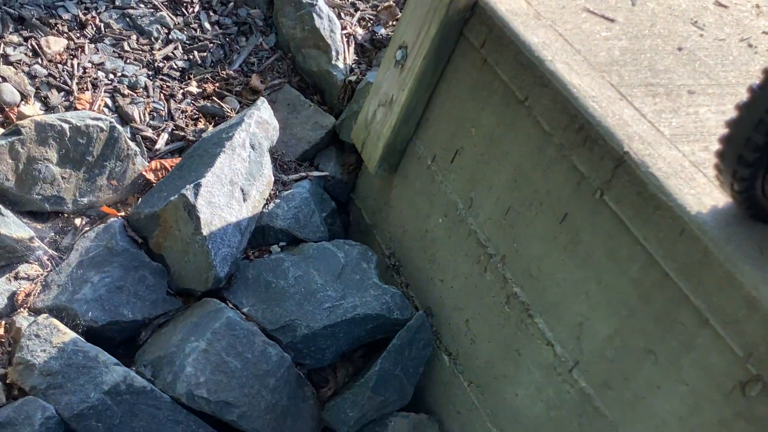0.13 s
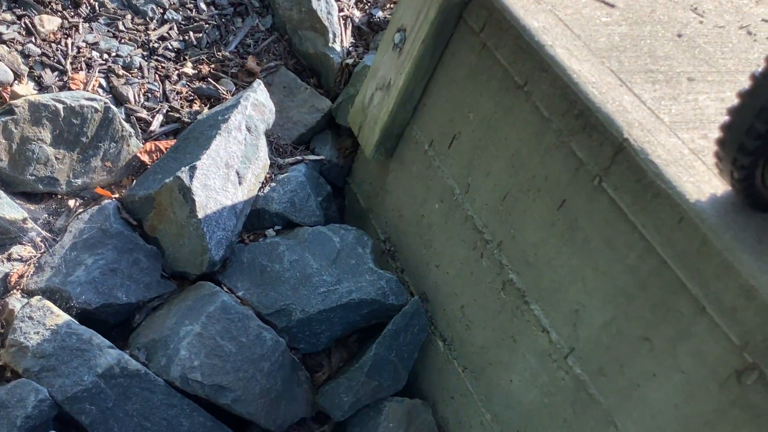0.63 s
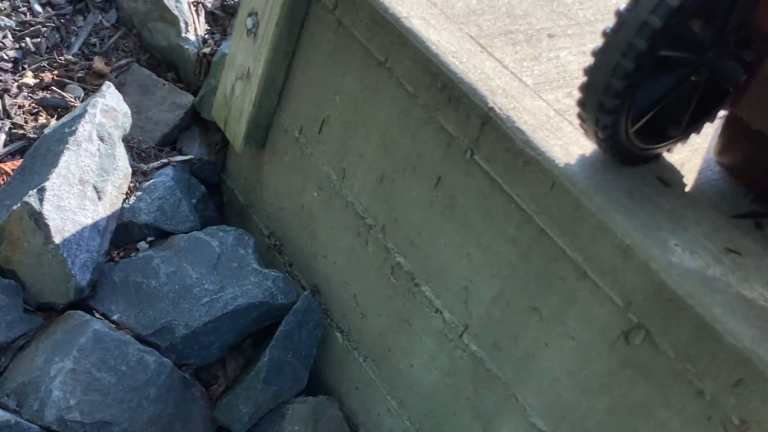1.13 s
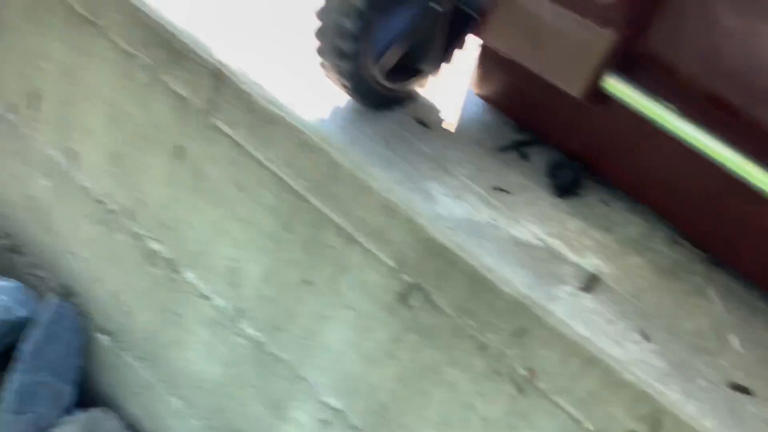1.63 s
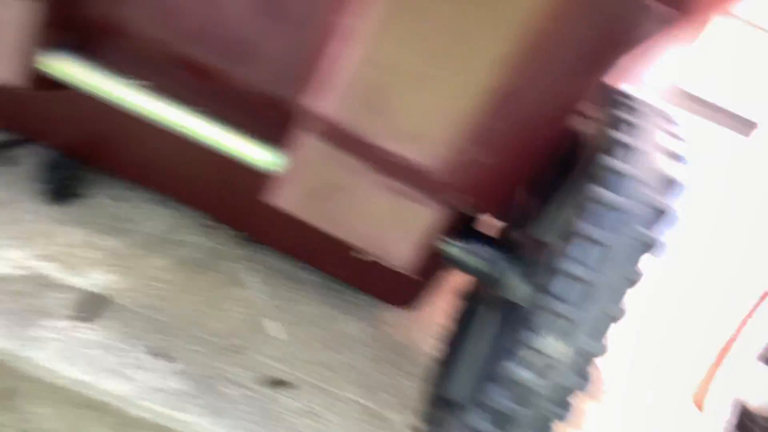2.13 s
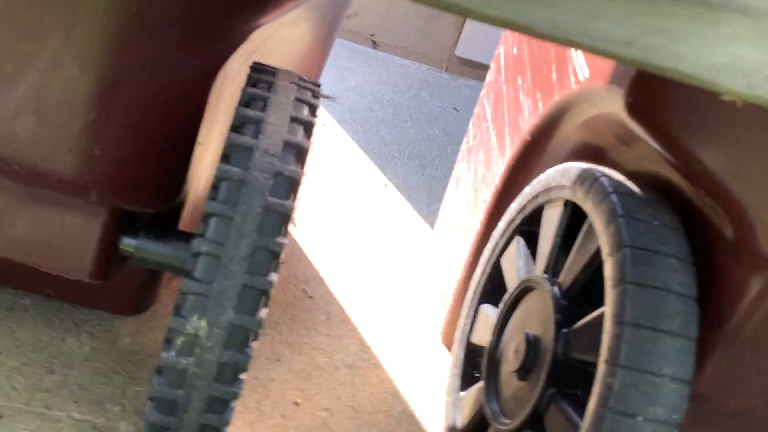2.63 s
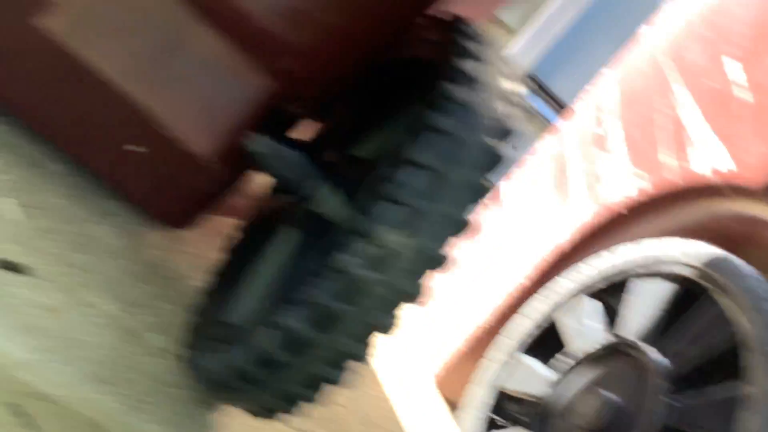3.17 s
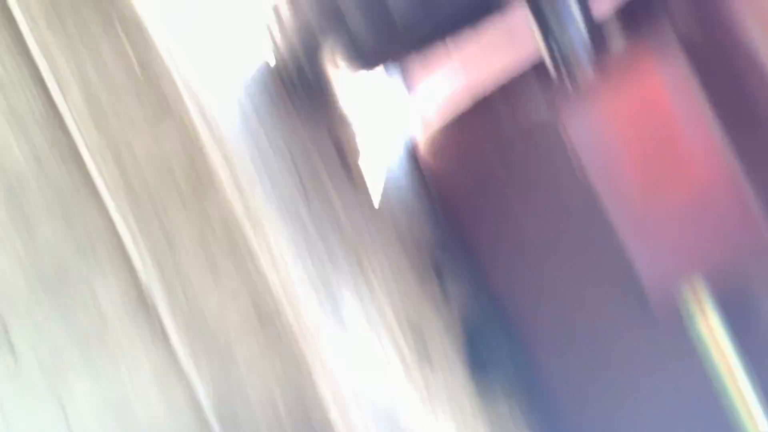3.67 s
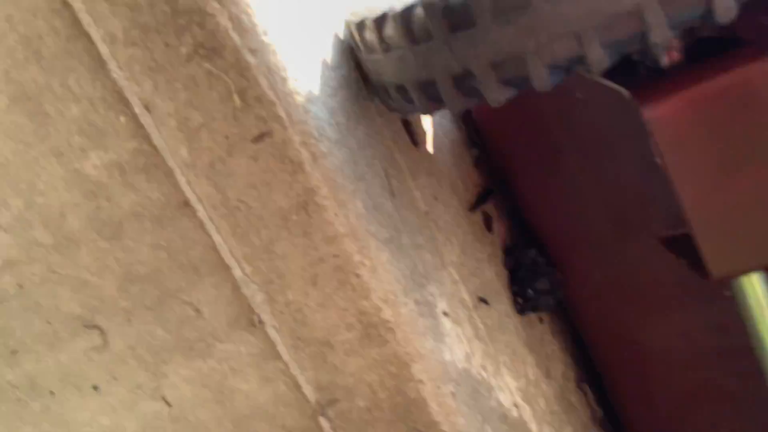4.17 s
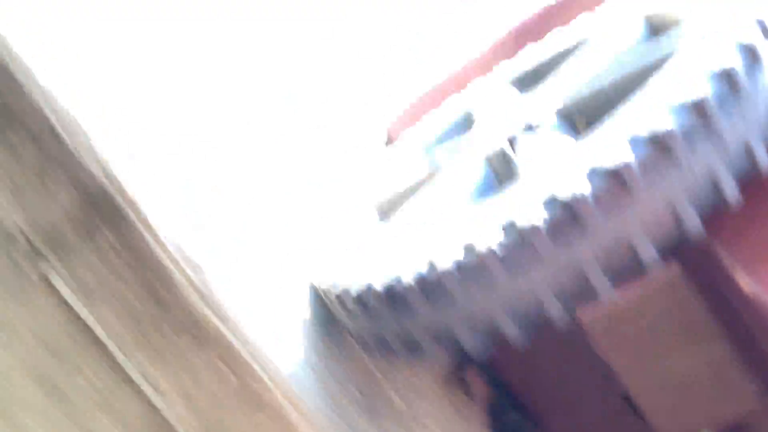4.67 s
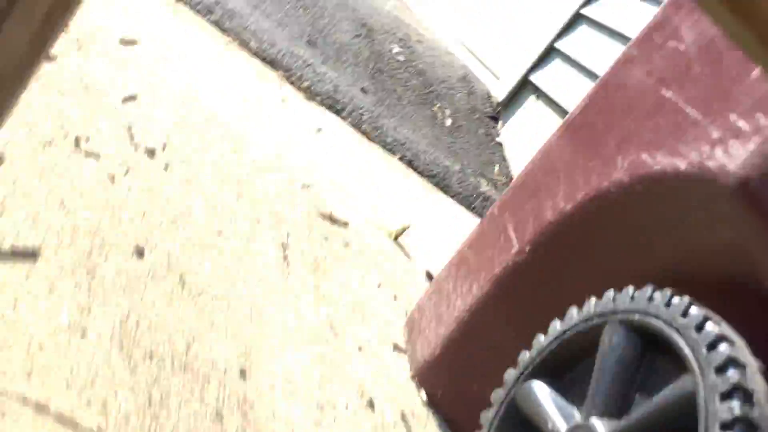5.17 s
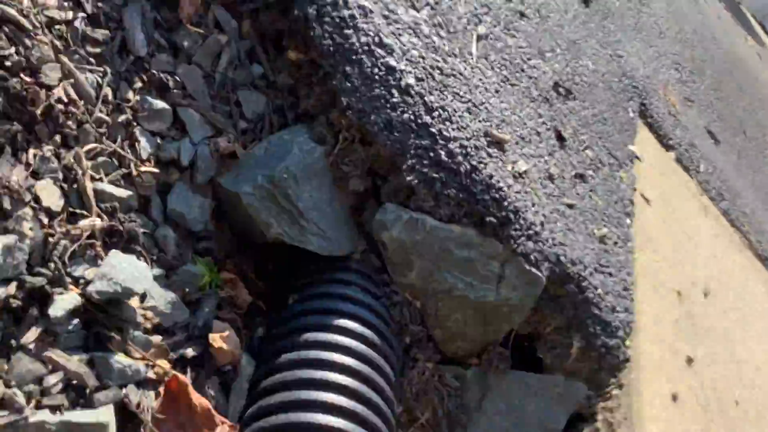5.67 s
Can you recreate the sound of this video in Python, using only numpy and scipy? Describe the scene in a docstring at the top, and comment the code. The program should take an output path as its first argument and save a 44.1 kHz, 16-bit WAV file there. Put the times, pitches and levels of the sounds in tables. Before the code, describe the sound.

Close grit scrapes, clicking stones and one hard knock late on, with echoing bird whistles and a distant buzzy bird outdoors.

```python
"""Footsteps on grit with two birds

Low over gravel and concrete outdoors, a bird repeats falling whistles that echo off the houses; a second one,
further off, buzzes by a trembling pitch. Soles scuff grit (dense noise grains), stones click (noise puffs that
ring damped modes of the handled phone's body) and grind (clustered grains in one band). Footfalls and bumps of
the handled phone give dull knocks, sines of sagging pitch, over a distant traffic rumble of shaped noise."""
import sys
import numpy as np
from scipy import signal
from scipy.fft import rfft, irfft
from scipy.io import wavfile
from scipy.ndimage import uniform_filter1d

SR = 44100
rng = np.random.default_rng(int(sys.argv[2]) if len(sys.argv) > 2 else 0)


def waveform_to_disk(signal):
    """Save audio, clipped to [-1, 1], as 16-bit WAV at the path in sys.argv[1]."""
    frames = np.transpose(np.atleast_2d(signal))
    scaled = np.clip(frames, -1, 1) * 32767
    samples = np.round(scaled).astype(np.int16)
    wavfile.write(sys.argv[1], SR, samples)


def how_loud(loudness_db):
    """Turn decibels into a plain amplitude multiplier (0 dB gives 1, 20 dB gives 10)."""
    steps = np.asarray(loudness_db, float) / 20
    return 10 ** steps


N = 255780  # length in samples

# Spectrum of the distant traffic. Each row: frequency in Hz, relative level in dB.
TRAFFIC_SPECTRUM = [(24, -36.5), (40, -19.5), (64, 2), (93, 3), (202, -13.5), (260, -12.5), (397, -15),
                    (926, -16), (1130, -25), (1680, -41.5), (3300, -47), (7340, -45), (15500, -48)]
# Pitch glides of the near bird, by name. Each entry: length in seconds, then points of (share of length, Hz).
NOTE_SHAPES = {"low": (0.036, [(0, 3300), (.2, 3300), (1, 2375)]), "high": (0.028, [(0, 5000), (.3, 4860),
               (1, 4500)]), "bend": (.064, [(0, 4580), (.45, 4300), (1, 3300)]), "dive": (.057, [(0, 4970),
               (.25, 4720), (1, 2860)]), "slide": (0.055, [(0, 4750), (.3, 4490), (1, 3400)])}
# One song of the near bird. Each row: delay after the song's start in seconds, note shape, relative level in dB.
SONG_NOTES = [(0, "bend", -2.5), (.121, "dive", -2), (.217, "dive", 0), (.335, "dive", -0.5)]
# Songs sung. Each row: start in seconds, level in dB, lead-in level in dB, gain per note in dB, number of notes.
SONG_STARTS = [(0.586, -58, -70, -0.5, 4), (2.092, -55.5, -67, -1.2, 4), (5.174, -64.5, -76, .5, 3)]
# Stones struck. Each row: start in seconds, crack level in dB, ring level in dB.
STONE_CLICKS = [(1.2395, -45, -75), (1.279, -35, -62.5), (1.2875, -40, -65), (1.3049, -31, -60),
                (1.3874, -36.5, -71), (1.4108, -34, -67.5), (1.472, -42, -72), (1.5131, -24.5, -56.5),
                (1.5237, -23, -61), (1.583, -35, -61), (1.694, -35.5, -67), (1.752, -43, -85),
                (2.003, -33, -56), (2.4783, -37, -81), (2.5555, -38, -94), (2.585, -28.5, -65),
                (3.1181, -32, -51), (3.2628, -27, -36), (3.3964, -33, -45), (3.4383, -26.5, -38),
                (3.4442, -28, -34), (3.707, -28, -67), (3.764, -37, -55.5), (3.805, -21, -61),
                (3.894, -20, -69), (4.1321, -52, -47.5), (4.2102, -37, -72), (4.798, -29.5, -57),
                (4.931, -28, -66), (4.9355, -24, -69), (4.973, -25.5, -48), (5.353, -30, -58),
                (5.4944, -42, -37), (5.5042, -5.5, -17), (5.5142, -46, -42), (5.6384, -54, -47.5),
                (5.705, -25, -58), (5.7793, -33, -62)]
# Lone grit ticks, nearly all crack. Each row: start in seconds, crack level in dB.
GRIT_TICKS = [(1.647, -35), (1.666, -40), (1.8914, -38.5), (1.9092, -41), (3.1556, -36), (3.1927, -43),
              (3.745, -31), (3.791, -31), (3.964, -34), (4.042, -30), (4.0614, -32), (4.09, -34),
              (4.222, -40), (4.255, -38), (4.2794, -32), (4.3822, -42), (4.415, -29.5), (4.4867, -35),
              (4.5279, -31), (4.5828, -36), (4.6553, -36), (4.6807, -34), (4.79, -40.5)]
# Modes of the handled phone's body, rung by every click. Each row: nominal frequency in Hz, mean relative level
# in dB, 60 dB decay in seconds.
BODY_MODES = [(1200, 1.5, 0.0035), (1830, -19.5, 0.0082), (2115, 0.5, 0.0043), (2830, -12.5, 0.0055),
              (3300, -28, 0.014), (4860, -12, 0.0024), (5500, -13, 0.0029)]
# Spectrum of fine grit and splinters. Each row: frequency in Hz, relative level in dB.
GRIT_SPECTRUM = [(2350, -17.5), (4000, -8.5), (8160, -8), (9170, -6), (12200, -2), (13900, -4), (16000, -3)]
# Spectrum of the coarser stones. Each row: frequency in Hz, relative level in dB.
STONE_SPECTRUM = [(410, 7), (700, 1), (1340, -4.5), (2100, -4.5), (2700, -7), (6000, -22.5), (7800, -48),
                  (13200, -120)]
# Soles dragged on grit. Each row: start in seconds, length in seconds, fine grit dB, coarse stones dB.
SOLE_DRAGS = [(1.261, 0.049, -59, -60.5), (1.35, .12, -78, -78.5), (1.492, 0.064, -60.5, -62.5),
              (1.576, 0.1, -52.5, -61.5), (1.802, 0.12, -66.5, -70), (1.921, 0.075, -54.5, -61.5),
              (2.007, 0.39, -81, -68.5), (2.437, 0.085, -72.5, -80), (2.565, 0.081, -60.5, -61.5),
              (2.872, 0.31, -76, -64), (3.075, 0.13, -62.5, -58.5), (3.238, 0.071, -67.5, -74),
              (3.364, 0.11, -59, -61), (3.426, 0.068, -57, -53), (3.522, .1, -60.5, -62),
              (3.601, 0.079, -62, -54), (3.691, 0.039, -57, -66), (3.729, 0.069, -46, -59.5),
              (3.862, 0.2, -49, -56), (4.108, 0.021, -67.5, -64), (4.202, 0.022, -73, -70),
              (4.241, 0.22, -52, -59.5), (4.468, 0.076, -54, -60.5), (4.564, 0.16, -54.5, -61),
              (4.79, 0.14, -61, -65), (4.908, 0.025, -55, -55.5), (4.965, 0.079, -68, -71),
              (5.098, 0.25, -72, -71), (5.239, 0.062, -61.5, -63.5), (5.3, 0.15, -64, -59),
              (5.455, 0.076, -58, -57.5), (5.553, 0.043, -46.5, -51.5), (5.594, 0.086, -59.5, -52.5),
              (5.708, 0.1, -63, -63)]
# Footfalls and bumps of the handled phone. Each row: start in seconds, level in dB, nominal pitch in Hz.
DULL_KNOCKS = [(1.63, -45.5, 990), (1.968, -43.5, 747), (2.102, -44, 175), (2.657, -37, 938),
               (2.691, -36.5, 142), (2.866, -50, 950), (3.2633, -29.5, 418), (3.28, -42.5, 170),
               (3.398, -38, 320), (3.446, -31, 300), (3.481, -34, 155), (4.01, -33.5, 379),
               (4.135, -36, 312), (4.507, -42.5, 130), (5, -34, 357), (5.39, -43, 425), (5.449, -24.5, 229),
               (5.516, -18, 243), (5.577, -36, 120), (5.638, -26, 238), (5.704, -36.5, 195)]
# Stones grinding under the weight. Each row: start in seconds, length in seconds, centre in Hz,
# rms level in dB before the envelope.
STONE_GRINDS = [(1.815, 0.021, 815, -58.5), (2.654, 0.041, 700, -48.5), (3.163, 0.027, 330, -52),
                (3.448, 0.045, 465, -52.5), (3.63, 0.066, 550, -55), (3.651, 0.035, 300, -48),
                (3.976, 0.024, 700, -52), (4.309, 0.034, 13900, -48), (4.316, 0.066, 1110, -58.5),
                (5.345, 0.072, 1200, -59.5), (5.493, 0.015, 1506, -30.5), (5.496, 0.0173, 6950, -46),
                (5.565, 0.028, 730, -40.5), (5.568, 0.012, 9100, -47)]
# Single buzzes of the far bird. Each row: start in seconds, length in seconds, pitch in Hz,
# buzz width in Hz, level in dB.
FAR_BUZZES = [(2.23, 0.075, 5900, 500, -73), (2.605, 0.21, 6150, 350, -65.5),
              (2.611, 0.23, 4440, 1364, -65), (2.803, 0.073, 3058, 447, -68.5)]


def burst(t60, seconds, rise=0.00034):
    """Exponential decay: an envelope that rises quickly and falls by 60 dB in t60 seconds."""
    t = np.arange(int(seconds * SR)) / SR
    return (1 - np.exp(-t / rise)) * np.exp(-np.log(1000) * t / t60)


def add(out, s, x):
    """Superposition: mixes x in at time s."""
    i = int(s * SR)
    out[i:i + len(x)] += x[:len(out) - i]


def unit(x):
    """Normalisation to an rms of 1."""
    return x / np.sqrt(np.mean(x ** 2))


def colour(x, points):
    """Linear filtering: shapes the spectrum along (Hz, dB) points, then sets the rms to 1."""
    hz, db = np.transpose(points)
    f = np.fft.rfftfreq(len(x), 1 / SR) + 1
    gain = how_loud(np.interp(np.log(f), np.log(hz), db))
    return unit(irfft(rfft(x) * gain, len(x)))


def walk(rate):
    """Slow random modulation: levels held for 1 / rate seconds and slewed twice; spread near 1."""
    k = int(SR / rate)
    held = np.repeat(rng.standard_normal(N // k + 1), k)
    return 1.52 * uniform_filter1d(uniform_filter1d(held, k), k)[:N]


def grains(rate, spread_db, smear_s):
    """Random impacts: scattered puffs of noise, a few much bigger than the rest."""
    size_db = np.minimum(spread_db * rng.exponential(size=N), 16)
    hits = (rng.random(N) < rate / SR) * how_loud(size_db)
    power = signal.fftconvolve(hits ** 2, burst(smear_s, 2 * smear_s) ** 2)[:N]
    return np.sqrt(np.abs(power)) * rng.standard_normal(N)


def echo(x, t60, wet_db, rise_s):
    """Diffuse reflection: walls and trees send back a scattered, fading tail."""
    tail = burst(t60, t60, rise=rise_s) * rng.standard_normal(int(t60 * SR))
    tail = tail / np.sqrt(np.sum(tail ** 2))
    return x + how_loud(wet_db) * signal.fftconvolve(x, tail)[:N]


def traffic():
    """Broadband noise with a sloping spectrum: a smooth distant roar whose bass throbs on its own."""
    roar = colour(rng.standard_normal(N), TRAFFIC_SPECTRUM)
    bass = signal.sosfilt(signal.butter(2, 130, fs=SR, output="sos"), roar)
    upper = (roar - bass) * how_loud(.8 * walk(1.5))
    return how_loud(-59.5) * (upper + bass * how_loud(1.5 * walk(5)))


def notes():
    """Temporal pattern of the near bird: a fading trill and its songs, as (s, shape, dB)."""
    trill_s, gap_s, trill_db, fade_db = 3.71, .107, -62, -0.9
    rows = [(3.584, "dive", trill_db)]  # one dive, then slides at an even pace
    rows += [(trill_s + k * gap_s, "slide", trill_db + k * fade_db) for k in range(6)]
    for s, db, lead_db, gain_db, count in SONG_STARTS:
        # two soft notes together lead into each song
        rows += [(s - .121, shape, lead_db) for shape in ("low", "high")]
        for k, (late, shape, note_db) in enumerate(SONG_NOTES[:count]):
            rows.append((s + late, shape, db + note_db + k * gain_db))
    return rows


def near_bird():
    """Frequency glides: falling whistles swell in the middle and flicker on their way through the leaves."""
    out = np.zeros(N)
    for s, shape, db in notes():
        length, points = NOTE_SHAPES[shape]
        u = np.linspace(0, 1, int(length * SR))
        hz = np.interp(u, *np.transpose(points))
        tone = np.sin(2 * np.pi * np.cumsum(hz) / SR)
        add(out, s, how_loud(db) * np.sin(np.pi * u ** 0.92) * tone)
    flicker = how_loud(3.5 * walk(300))
    return echo(out * flicker, t60=0.28, wet_db=1.5, rise_s=0.00037)


def clicks():
    """Modal impact: a bright puff of splinters and a short ring of the phone body's shared modes, struck
    differently."""
    out = np.zeros(N)
    hz, db, t60 = np.transpose(BODY_MODES)
    t = np.arange(int(.04 * SR))[:, None] / SR
    blows = STONE_CLICKS + [(s, tick_db, tick_db - 35) for s, tick_db in GRIT_TICKS]
    decay = np.exp(-np.log(1000) * t / t60)
    late = (1 - np.exp(-t * hz / 1.3)) ** 2  # the low modes speak later
    for s, crack_db, ring_db in blows:
        luck = rng.standard_normal(len(t) + 14)
        # glancing clicks, more crack than ring, are brighter: dB per octave
        tilt = 0.15 * (crack_db - ring_db - 23.5)
        # each stone has its own colour
        splinters = [(f, level + tilt * np.log2(f / 8000) + 5.1 * r)
                     for (f, level), r in zip(GRIT_SPECTRUM, luck[3:])]
        crack = colour(luck[14:], splinters) * burst(0.0077, .04, rise=0.0014)
        detuned_hz = hz * (1 + 0.041 * luck[7:14])
        modes = how_loud(db + 3.1 * luck[:7]) * np.sin(2 * np.pi * detuned_hz * t)
        ring = np.sum(modes * decay * late, axis=1)
        ring = ring / np.std(ring[:len(t) // 8])  # levelled over its first 5 ms
        add(out, s, how_loud(crack_db) * crack + how_loud(ring_db) * ring)
    return echo(out, t60=0.016, wet_db=-11.5, rise_s=0.0012)


def grit(rate, spread_db, smear_s, points, centres_hz, depth_db, swell_rate):
    """Size-dependent resonance: shared grains and each size's own ticks fill a broad band that swells alone."""
    f, out = np.fft.rfftfreq(N, 1 / SR) + 1, 0
    shared = grains(rate, spread_db, smear_s)
    for hz in centres_hz:
        band = np.exp(-(np.log2(f / hz) / 0.3) ** 2)
        own = 1.36 * grains(rate / 8, spread_db, smear_s / 2)
        out = out + irfft(rfft(shared + own) * band, N) * how_loud(depth_db * walk(swell_rate))
    return colour(out, points)


def scuff():
    """Granular friction: grit fizzes densely, bigger stones crunch sparser and lower under one kind of drag."""
    bite_s, swell = 0.0084, 0.12  # long drags build up more slowly: a share of the length joins the bite
    sag_db_per_s, lift_s = -43, 0.015  # the sole eases off, then lifts
    settle_db, settle_s = -22, 0.16  # loose grit trickles on
    fine_gain, coarse_gain = np.zeros((2, N))
    for s, length, fine_db, coarse_db in SOLE_DRAGS:
        t = np.arange(int((length + 0.36) * SR)) / SR
        after = np.maximum(t - length, 0)
        drag = how_loud(sag_db_per_s * t) * np.exp(-after / lift_s)
        drag = drag + how_loud(settle_db) * np.exp(-after / settle_s)
        drag = drag * (1 - np.exp(-t / (bite_s + swell * length))) ** 2
        add(fine_gain, s, how_loud(fine_db) * drag)
        add(coarse_gain, s, how_loud(coarse_db) * drag)
    slip = walk(90)  # the sole sticks and slips, all grains together
    fine = grit(1400, 4.4, 0.018, GRIT_SPECTRUM, [3300, 4750, 6840, 10270, 15650],
                depth_db=2.5, swell_rate=45)
    fine = fine + how_loud(-4) * colour(grains(110, 2.9, 0.0075), GRIT_SPECTRUM)  # lone splinters
    coarse = grit(500, 1.85, 0.037, STONE_SPECTRUM, [700, 1040, 1420, 2240, 3400, 5000],
                  depth_db=3.5, swell_rate=50)
    return fine * fine_gain * how_loud(2.16 * slip) + coarse * coarse_gain * how_loud(2.55 * slip)


def knocks():
    """Damped oscillation: a dull thump sags in pitch, with a rough edge and a slower, lingering low boom."""
    out = np.zeros(N)
    t = np.arange(int(.15 * SR)) / SR
    sag = 0.417 + 1.081 * np.exp(-t / 0.00838) + 1.51 * np.exp(-t / 0.00147)
    boom = burst(0.098, .15, rise=0.003) * np.sin(2 * np.pi * 120 * t)
    for s, db, hz in DULL_KNOCKS:
        phase = 2 * np.pi * np.cumsum(hz * sag) / SR
        thump = burst(0.039 + 6.2 / hz, .15, rise=0.002) * np.sin(phase)
        rough = colour(rng.standard_normal(len(t)),
                       [(100, -20), (hz, 0), (3 * hz, -4), (9 * hz, -25), (40 * hz, -55)])
        edge = burst(0.014, .15, rise=0.0023) * rough
        boom_gain = 0.25 * min(1, 250 / hz)  # high knocks boom less
        add(out, s, how_loud(db) * (thump + 0.64 * edge + boom_gain * boom))
    return echo(out, t60=0.086, wet_db=-5.5, rise_s=0.0025)


def grinds():
    """Band-limited impact noise: clustered knocks of stone on stone ring around one pitch."""
    out, rubble = np.zeros(N), grains(700, 2.9, 0.016)
    for s, length, hz, db in STONE_GRINDS:
        t = np.arange(int((length + 0.0093) * SR)) / SR
        shape = np.minimum(1, np.exp(-(t - length) / 0.0046)) * (1 - np.exp(-t / 0.00052))
        low = min(.85, .2 + 10.5 * length)  # long grinds ring narrower
        body = colour(rubble[int(s * SR):][:len(t)],
                      [(hz / 5, -22), (hz * low, -8), (hz, 0), (hz * 1.28, -8), (hz * 4, -26)])
        add(out, s, how_loud(db) * shape * body)
    return out


def far_bird():
    """Frequency modulation: a trembling pitch roughens whistles into buzzes, followed by their echo."""
    out = np.zeros(N)
    tremble = walk(900)

    def whistle(s, hz, width_hz, db):
        """Phase integration of a pitch that trembles by about half the width either way."""
        u = np.linspace(0, 1, len(hz))
        hz = hz + width_hz * .5 * tremble[int(s * SR):][:len(u)]
        tone = np.sin(2 * np.pi * np.cumsum(hz) / SR)
        add(out, s, how_loud(db) * np.sin(np.pi * u) ** .5 * tone)

    for s, length, hz, width_hz, db in FAR_BUZZES:
        whistle(s, np.full(int(length * SR), hz), width_hz, db)
    # four calls of 0.115 s hold a pitch for half their length and then drop to a lower one
    hold = .5
    u = np.linspace(0, 1, int(.115 * SR))
    fall = np.maximum(u - hold, 0) / (1 - hold)
    fall = np.sin(np.pi / 2 * np.minimum(3 * fall, 1)) ** 2  # a quick drop, then it lingers
    arch_hz = 160 * np.cos(2 * np.pi * u) ** 2  # the pitch bends up and down again in each half
    for k in range(4):
        start_hz = 4190 - k * 81.2  # each call starts a little lower
        width_hz = 158 * (1 + 1.5 * fall)
        whistle(2.862 + k * .122, start_hz - 800 * fall - arch_hz, width_hz, -61.5 - 9 * fall)
    return echo(out, t60=0.315, wet_db=-2.5, rise_s=0.0021)


def scene():
    """Superposition of all sources at one microphone."""
    ground = clicks() + scuff() + knocks() + grinds()
    return (traffic() + near_bird() + ground + far_bird())[None]


def band_limit(x):
    """A steep low-pass at the top of the band."""
    return signal.sosfilt(signal.butter(12, 16980, fs=SR, output="sos"), x)


def record(dry):
    """Band limitation: the microphone drops the deep bass and the very top."""
    x = signal.sosfilt(signal.butter(4, 55, "high", fs=SR, output="sos"), dry)
    x = signal.sosfilt(signal.ellip(6, .3, 30, 15800, fs=SR, output="sos"), x)
    return band_limit(x)


dry = scene()
out = record(dry)
waveform_to_disk(out)
```